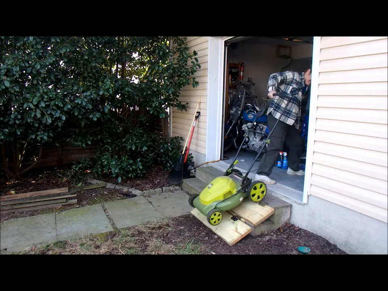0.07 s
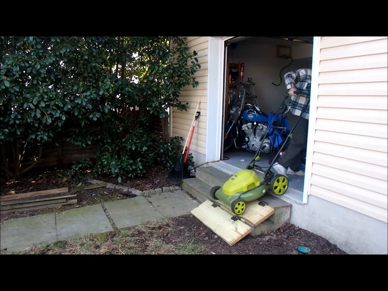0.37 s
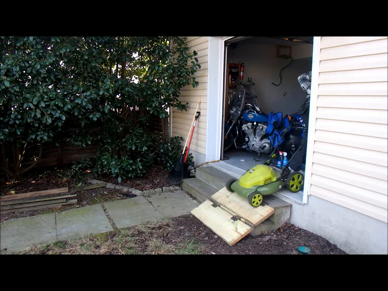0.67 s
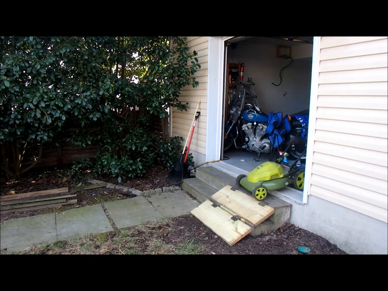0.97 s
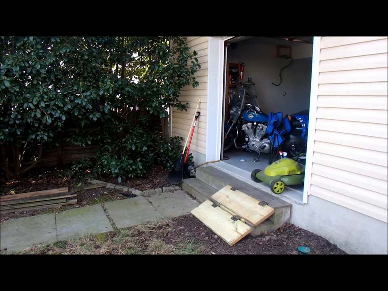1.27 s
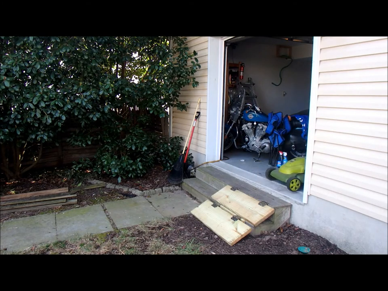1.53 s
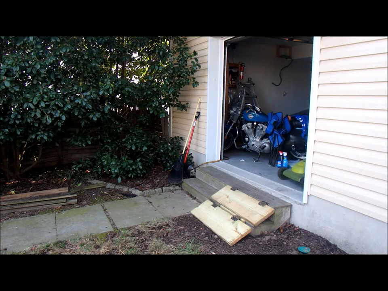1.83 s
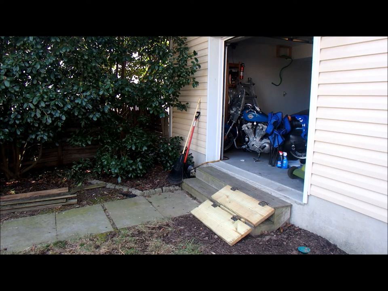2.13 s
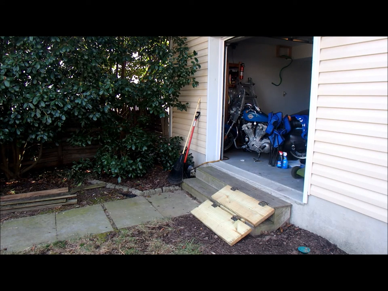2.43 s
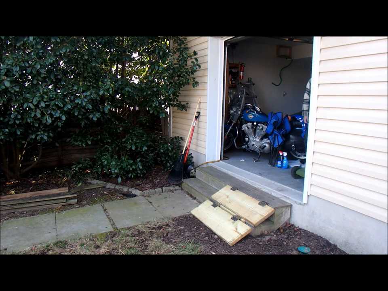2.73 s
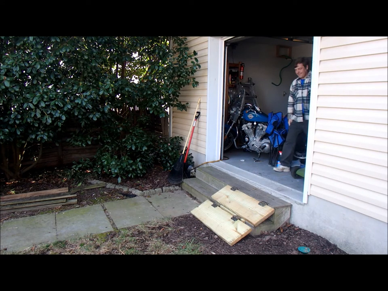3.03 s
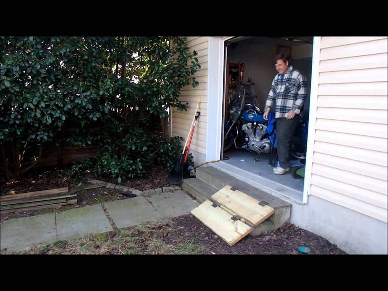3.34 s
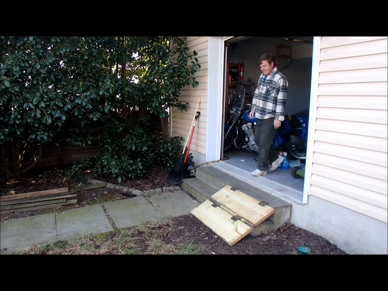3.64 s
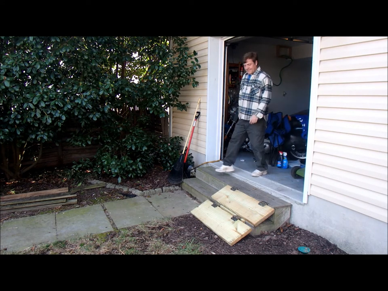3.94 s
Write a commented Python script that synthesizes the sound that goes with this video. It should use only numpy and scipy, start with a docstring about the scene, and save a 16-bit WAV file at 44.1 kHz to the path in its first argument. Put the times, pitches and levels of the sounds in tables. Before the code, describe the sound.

A plastic lawnmower, motor off, rolls up a wooden ramp nearby with hollow thuds and rattles, loudest at a sharp clack around 0.4 seconds. From about 1 second its wheels knock over a sill and rumble onto concrete, fading by 2.5. The axle squeaks near 1.8 and faintly at 2.2. Shoes scuff softly from 2.5, with a light hollow knock near 2.8, over faint distant hum and hiss.

```python
"""Knocks, clatter and rumble: a plastic lawnmower, motor off, is pulled up a plank ramp into a shed. Its hard
wheels thud on the planks, sill and concrete floor, and each blow shakes its deck (the body). An axle squeaks;
then shoes scuff on the gritty floor and one knocks against something hollow. A distant rumble and hiss lie
behind, sunk under the loud knocks and coming back afterwards; faint low hums swell and fade."""
import sys
import numpy as np
from scipy import signal
from scipy.fft import rfft, irfft
from scipy.io import wavfile
from scipy.ndimage import uniform_filter1d

SR = 44100
rng = np.random.default_rng(int(sys.argv[2]) if len(sys.argv) > 2 else 0)


def transcribe(u):
    """Save the signal u as a 16-bit wav file named by the first command-line argument.

    u: samples, shape (n,) or (channels, n), limited to [-1, 1]; the rate is SR.
    q: integer samples, one column per channel.
    """
    v = np.clip(np.atleast_2d(u).T, -1, 1)
    q = np.round(v * 32767).astype(np.int16)
    wavfile.write(sys.argv[1], SR, q)


N = 176400
T = np.arange(N) / SR


def amp(db):
    """Turn decibels into a volume multiplier."""
    return 10 ** (np.asarray(db) / 20)


def unit(x):
    """Scale a sound to an average strength (rms) of 1."""
    return x / np.sqrt(np.mean(x ** 2))


def noise():
    """Plain hiss: white noise."""
    return rng.standard_normal(N)


def curve(rows, column=1):
    """Join timed points with straight lines."""
    rows = np.array(rows)
    return np.interp(T, rows[:, 0], rows[:, column])


def wobble(rate_hz):
    """A smooth random wander, about 1 in size."""
    size = int(SR / rate_hz)
    steps = np.repeat(rng.standard_normal(N // size + 1), size)
    return unit(uniform_filter1d(steps, size)[:N])


def through(x, response):
    """Let every sample of x set off a copy of the response (convolution)."""
    return signal.fftconvolve(x, response)[:N]


def colour(x, tone):
    """Shape a sound by a tone table; white noise keeps its level."""
    size = 4096
    hz, db = np.array(tone).T
    gain = amp(np.interp(np.log(np.fft.rfftfreq(size, 1 / SR) + 1), np.log(hz), db))
    # build the filter so that it rings only after a hit, never before
    cepstrum = irfft(np.log(gain))[:size // 2]
    cepstrum[1:] *= 2
    response = irfft(np.exp(rfft(cepstrum, size)))
    return through(x, response / np.linalg.norm(response))


def keep(x, hz, kind, order=2):
    """Keep the "low" part, the "high" part or one "band" of a sound."""
    return signal.sosfilt(signal.butter(order, np.minimum(hz, SR / 2 - 1), kind, fs=SR, output="sos"), x)


def pitched_noise(hz, width_hz):
    """Hiss narrowed until it rings around one pitch."""
    return unit(keep(noise(), [hz - width_hz / 2, hz + width_hz / 2], "band", order=1))


def fade(start_s, fade_s):
    """Start suddenly, then die away by 60 dB in fade_s."""
    return (T >= start_s) * np.exp(-np.minimum(np.log(1000) * np.abs(T - start_s) / fade_s, 40))


# tone of the distant rumble and hiss: frequency_hz, level_db
AIR_TONE = [(20, -9), (100, 2), (350, -14), (1000, -24.5), (2900, -31), (3350, -19), (4400, -30),
            (15000, -30)]
# how loud they are over time: time_s, level_db
AIR_LEVEL = [(0, -46), (.45, -71), (1.8, -52.5), (2.7, -47), (4, -47)]
def distant_air():
    """Far-off rumble and hiss sink early on, then come back."""
    return colour(noise(), AIR_TONE) * amp(curve(AIR_LEVEL) + 0.46 * wobble(5.84))


# faint low hums: start_s, end_s, pitch_hz, fall_hz_per_s, level_db
HUMS = [(2, 3.28, 154, 5, -50.5), (2.59, 4.2, 120, 0, -52.5), (2.08, 2.5, 229, 0, -50.5)]
def low_hums():
    """Low, slightly wavering tones swell and fade."""
    out = 0
    for start, end, hz, fall, db in HUMS:
        swell = np.clip(np.minimum(T - start, end - T) / 0.079, 0, 1)
        pitch = (hz - fall * (T - start)) * (1 + 0.0053 * wobble(12))
        tone = unit(np.sin(2 * np.pi * np.cumsum(pitch) / SR))
        out += amp(db + 2.2 * wobble(7.9)) * swell * tone
    return out


SILL_S, OUTSIDE_DB, INSIDE_DB = 0.94, -12.5, -11
def shed_echo(x):
    """The shed echoes more once the mower is over the sill."""
    tail = keep(noise(), 5550, "low", order=1) * fade(0.008, fade_s=0.32)
    echo_db = np.interp(T, [SILL_S - 0.5, SILL_S + 0.5], [OUTSIDE_DB, INSIDE_DB])
    return through(x * amp(echo_db), tail / np.linalg.norm(tail))


# shoe scuffs: peak_s, rise_s, fade_s, sole_db, hiss_db
SCUFFS = [(2.505, 0.034, 0.28, -52, -46.5), (2.72, 0.13, 0.19, -51.5, -72), (2.778, 0.018, 0.4, -41, -57),
          (3.55, 0.2, 0.81, -51.5, -66)]
# tone of a rubbing sole: frequency_hz, level_db
SOLE_TONE = [(100, 4), (1180, -3.5), (3400, -3.5), (4500, -11), (6450, -20), (14000, -43)]
# tone of the grit hissing under it: frequency_hz, level_db
HISS_TONE = [(2000, -6), (9300, -2.5), (12000, -17)]
def shoe_scuffs():
    """Soles slide on the gritty shed floor."""
    sole = hiss = 0
    for peak, rise, fade_s, sole_db, hiss_db in SCUFFS:
        slide = np.clip(1 + (T - peak) / rise, 0, 1) * (T < peak) + fade(peak, fade_s)
        sole += amp(sole_db) * slide
        hiss += amp(hiss_db) * slide
    grain = lambda: unit(noise() * amp(2.7 * wobble(300)))
    return colour(grain() * sole, SOLE_TONE) + colour(grain() * hiss, HISS_TONE)


# notes of something hollow in the shed: pitch_hz, width_hz, level_db
HOLLOW_NOTES = [(1154, 80, -39), (3420, 110, -39), (6370, 140, -43)]
def shoe_bump(peak_s=2.777, rise_s=0.008, fade_s=0.17):
    """A shoe clacks against something hollow, which rattles briefly at its own notes."""
    rattle = sum(amp(db) * pitched_noise(hz, width) for hz, width, db in HOLLOW_NOTES)
    rise = (T < peak_s) * np.exp(-np.abs(T - peak_s) / rise_s)
    return rattle * (rise + fade(peak_s, fade_s))


def rub(hz, waver):
    """Surfaces stick and slip, making a fluttering tone with a weak octave above."""
    phase = 2 * np.pi * np.cumsum(hz * (1 + waver * wobble(400))) / SR
    tone = np.sin(phase) + amp(-31) * np.sin(2 * phase)
    return unit(tone * amp(1.3 * wobble(250)))


# axle squeaks, one list of points each: time_s, pitch_hz, level_db
SQUEAKS = [
    [(1.755, 2150, -51), (1.771, 2950, -50), (1.776, 3250, -31), (1.79, 3720, -41), (1.803, 3960, -45),
     (1.821, 4060, -44), (1.85, 3420, -32.5), (1.861, 3180, -28), (1.881, 3150, -36.5)],
    [(2.12, 2600, -60), (2.165, 3240, -47), (2.225, 3900, -64), (2.29, 3254, -43.5), (2.32, 3200, -52),
     (2.345, 2400, -53)],
]
# how rough each squeak is: pitch_waver_fraction, scrape_db
SQUEAK_ROUGHNESS = [(0.013, -32), (.023, -4)]
def axle_squeaks():
    """Squeaks rise and fall with the wheel's speed, over a dry scrape."""
    out = 0
    for points, (waver, scrape_db) in zip(SQUEAKS, SQUEAK_ROUGHNESS):
        tone = rub(curve(points), waver)
        scrape = amp(scrape_db) * unit(keep(noise(), [2400, 5400], "band"))
        sounding = (T > points[0][0]) * (T < points[-1][0])
        out += (tone + scrape) * amp(curve(points, column=2)) * sounding
    return out


# chirps of plastic: start_s, length_s, pitch_hz, level_db
CHIRPS = [(0.001, 0.04, 5950, -38), (0.188, 0.011, 6050, -37), (0.189, 0.021, 3710, -33),
          (0.249, 0.013, 1566, -26), (0.264, 0.0058, 3250, -27.5), (1.657, 0.019, 3180, -29.5)]
def plastic_chirps():
    """Plastic parts rub together for a moment."""
    out = 0
    for start, length, hz, db in CHIRPS:
        swell = np.sin(np.pi * np.clip((T - start) / length, 0, 1))
        out += amp(db) * rub(hz, waver=0.018) * swell
    return out


# echoes of the squeaks: delay_s, level_db
SQUEAK_ECHOES = [(.0037, -6), (0.0151, -10.5)]
def squeak_echoes(squeaks):
    """Squeaks bounce off the floor and the door frame."""
    return sum(amp(db) * np.interp(T - delay, T, squeaks) for delay, db in SQUEAK_ECHOES)


# ticks of small plastic parts: start_s, level_db
TICKS = [(.153, -45.5), (.283, -41), (.538, -38), (.599, -41.5), (0.841, -49.5), (1.063, -48)]
RATTLE_FADE_S = 0.21
def plastic_ticks():
    """Small parts tick: a hard contact, then a brief bright rattle."""
    level = sum(amp(db) * (fade(start, 0.045) + amp(-9.5) * fade(start, RATTLE_FADE_S))
                for start, db in TICKS)
    return level * unit(keep(noise(), [3500, 9400], "band", order=4))


# sharp clicks: start_s, peak_db, top_hz
CLICKS = [(0.397, -6, 12700), (3.044, -25, 2500)]
def clicks():
    """Hard edges snap together."""
    out = 0
    for start, db, top_hz in CLICKS:
        spike = 1.0 * (np.arange(N) == int(start * SR))
        snap = keep(spike, top_hz, "low", order=6)
        snap = keep(snap, top_hz / 9, "high")
        out += amp(db) * snap / np.abs(snap).max()
    return out


# rolling loudness, set by wheel speed and the ground: time_s, level_db
ROLL_LEVEL = [(0, -34), (.27, -31), (.5, -40), (.76, -42.5), (.82, -38), (.92, -44.5), (1.04, -43),
              (1.13, -37), (1.6, -37), (1.74, -44), (1.81, -39), (1.9, -45.5), (2.09, -48), (2.2, -42),
              (2.6, -54.5), (2.8, -50)]
# how much its treble is turned up or down: time_s, change_db
ROLL_TREBLE = [(.3, -3), (.57, 4), (.85, 0.5), (1.03, -5.5), (1.2, -0.5)]
# tone of the rolling wheels: frequency_hz, level_db
WHEEL_TONE = [(55, -26.5), (120, 2.5), (190, -1.5), (250, 6.5), (380, -3.5), (1600, -7), (2800, -15),
              (3400, -10.5), (4300, -18), (8500, -27), (15000, -51.5)]
def rolling(hits_per_s=900, treble_hz=2400):
    """Hard wheels run over grain and grit: many tiny hits, each smeared out by the shaking deck."""
    hits = rng.random(N) < hits_per_s / SR
    grit = hits * noise() * amp(1.5 * np.clip(noise(), -2, 2))
    grit *= amp(0.5 * wobble(44.77))  # bumps in the ground
    shudder = noise() * np.sqrt(np.abs(through(grit ** 2, fade(0, 0.077) ** 2)))
    crunch = unit(unit(grit) + amp(7) * unit(shudder))
    roll = colour(crunch * amp(curve(ROLL_LEVEL)), WHEEL_TONE)
    # filter forwards, then backwards, so the treble stays in step
    treble = keep(keep(roll, treble_hz, "high")[::-1], treble_hz, "high")[::-1]
    return roll + (amp(curve(ROLL_TREBLE)) - 1) * treble


# wheel knocks on planks, sill and concrete: start_s, thud_db, clatter_db, rattle_db
KNOCKS = [(0.001, -26.5, -21.5, -27), (0.107, -23.5, -25.5, -61), (.126, -16.5, -28, -51),
          (0.152, -26, -24, -38), (.21, -47, -24, -55), (0.284, -35, -29.5, -37), (0.372, -16.5, -18, -24),
          (.392, -25, -12.5, -19), (0.421, -25.5, -25, -45), (.65, -32.5, -28, -43.5),
          (0.669, -28, -28, -38), (1.072, -24, -29.5, -48), (1.086, -34.5, -28, -43),
          (1.099, -27.5, -33.5, -41), (1.205, -28, -28, -34.5), (1.228, -34.5, -26, -28.5),
          (1.288, -42, -30.5, -36.5), (1.32, -46, -32.5, -34.5), (1.444, -51, -31.5, -37.5),
          (1.496, -35, -33.5, -74), (1.585, -32, -31.5, -40), (1.661, -40, -34, -35)]
# tone of the ground's thud: frequency_hz, level_db
THUD_TONE = [(50, -25), (100, -3.5), (128, 0.5), (175, -3), (245, 1), (340, -10), (1200, -64)]
# tone of the deck's clatter: frequency_hz, level_db
CLATTER_TONE = [(120, -26.5), (300, -1.5), (1100, 0.5), (1750, -3), (3800, -17.5), (5000, -49),
                (14000, -51)]
# tone of the loose parts' rattle: frequency_hz, level_db
RATTLE_TONE = [(800, -39.5), (2000, 1), (2950, -8), (3250, -1), (3800, -0.5), (4200, -10), (6400, -11.5),
               (9200, -16), (11500, -32), (15000, -63)]
def wheel_knocks(contact_s=0.004):
    """A hard contact, then a short shudder: the ground thuds, the deck clatters, loose parts rattle."""
    parts = [(THUD_TONE, 0.13, -0.5), (CLATTER_TONE, 0.14, 0), (RATTLE_TONE, RATTLE_FADE_S, 0)]
    contact = amp(-2) ** 2 * np.exp(-T / contact_s)
    out = 0
    for part, (tone, fade_s, gain_db) in enumerate(parts):
        blows = np.zeros(N)
        for start, *levels_db in KNOCKS:
            blows[int(start * SR)] += amp(levels_db[part]) ** 2
        energy = np.abs(through(blows, contact + fade(0, fade_s) ** 2))
        out += amp(gain_db) * colour(np.sign(noise()) * np.sqrt(energy), tone)
    return out


# low notes under each knock's thud: pitch_hz, level_db, fade_s
BOOM_NOTES = [(126, -2, 0.2), (168, -11, 0.11)]
def hollow_boom():
    """Each wheel blow bends the hollow planks and deck, which swing at their lowest notes."""
    blows = np.zeros(N)
    for start, thud_db, *_ in KNOCKS:
        blows[int(start * SR)] += amp(thud_db)
    blows = keep(blows, 72, "high", order=3)  # the planks are too small to give off deeper bass
    swing = sum(amp(db) * np.sin(2 * np.pi * hz * T) * fade(0, fade_s) for hz, db, fade_s in BOOM_NOTES)
    return through(blows, swing)


# notes of the deck and planks: pitch_hz, level_db, fade_s
DECK_NOTES = [(244.7, -6, 1), (538, -1.5, 0.15), (924, -9, 0.27), (1104, 3, 0.25), (1660, -6, 0.3),
              (3250, 10, 0.057)]
def deck_ring(shaking):
    """Once struck, the deck and planks ring on at their own notes."""
    ring = sum(amp(db) * np.cos(2 * np.pi * hz * T) * fade(0, fade_s) / fade_s
               for hz, db, fade_s in DECK_NOTES)
    return through(shaking, ring) * 2 * np.log(1000) / SR


def mower(concrete_s=1.18):
    """Knocks and rolling shake the deck; on concrete the planks' boom is gone and the wheel hubs ring."""
    shaking = wheel_knocks() + rolling()
    body = shaking + amp(-8.5) * deck_ring(shaking) + hollow_boom() + plastic_ticks()
    thin_body = keep(body, 146, "high")
    hubs = pitched_noise(3180, width_hz=36) * amp(curve(ROLL_LEVEL) - 14)
    on_concrete = np.clip((T - concrete_s) / 0.06, 0, 1)
    return (1 - on_concrete) * body + on_concrete * (thin_body + hubs)


def scene(right_db=2.5):
    """Everything sits a little to the right; of the nearby sounds, only the treble spreads wide."""
    squeaks = axle_squeaks() + plastic_chirps()
    squeaks += squeak_echoes(squeaks)
    near = mower() + clicks() + shoe_scuffs() + shoe_bump()
    near += squeaks + shed_echo(near + amp(-5) * squeaks)
    scatter = noise() * fade(0.0013, 0.0097)
    scattered = through(near, scatter / np.linalg.norm(scatter))
    near_width = amp(-3.5) * keep(scattered, 5300, "high", order=4)
    behind = low_hums() + distant_air()
    far_width = amp(-3) * (keep(distant_air(), 2800, "high", order=1) + amp(-1.5) * distant_air())
    sides = np.array([[1], [-1]])  # left, right
    return (near + behind + sides * (near_width + far_width)) * amp(-sides * right_db / 2)


def record(dry, spacing_hz=1025, width_hz=110, top_hz=15400):
    """Cut a row of narrow gaps in the treble, round off the loudest peak and remove the highest hiss."""
    for gap_hz in spacing_hz * np.arange(2, 7):
        dry = signal.lfilter(*signal.iirnotch(gap_hz, gap_hz / width_hz, fs=SR), dry)
    return signal.sosfilt(signal.ellip(10, 0.2, 80, top_hz, fs=SR, output="sos"), np.tanh(dry))


dry = scene()
out = record(dry)
transcribe(out)
```